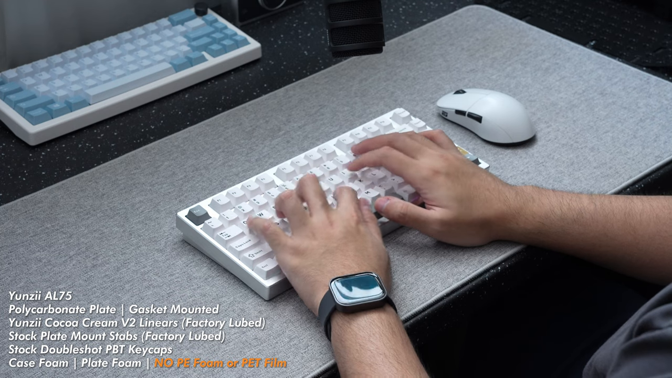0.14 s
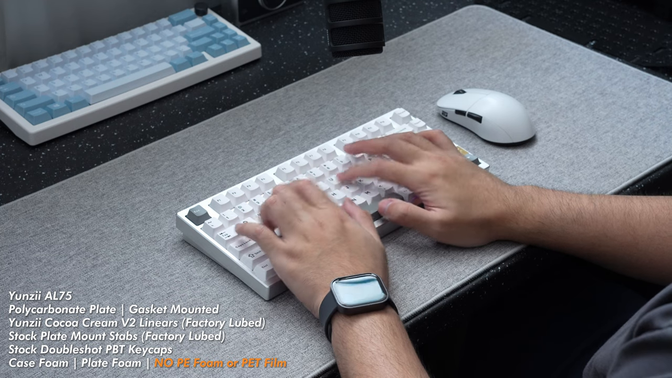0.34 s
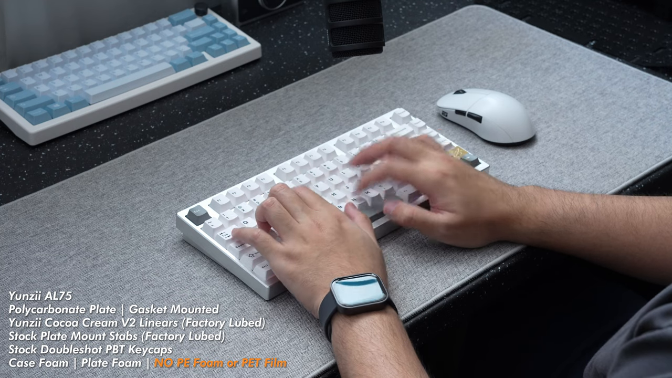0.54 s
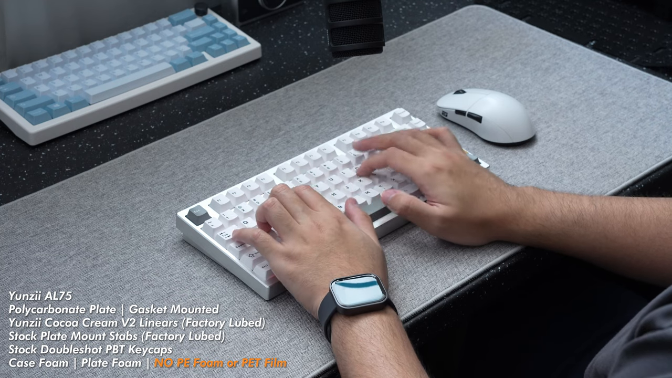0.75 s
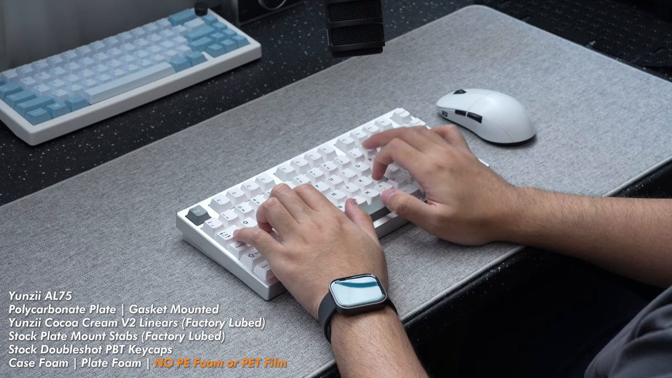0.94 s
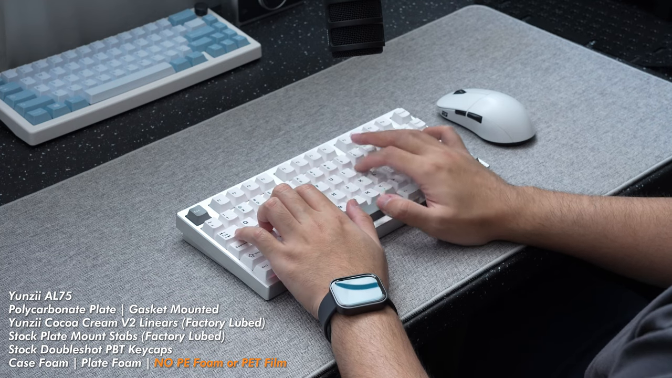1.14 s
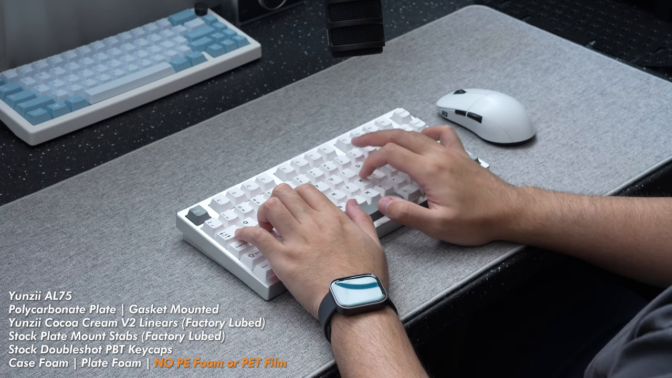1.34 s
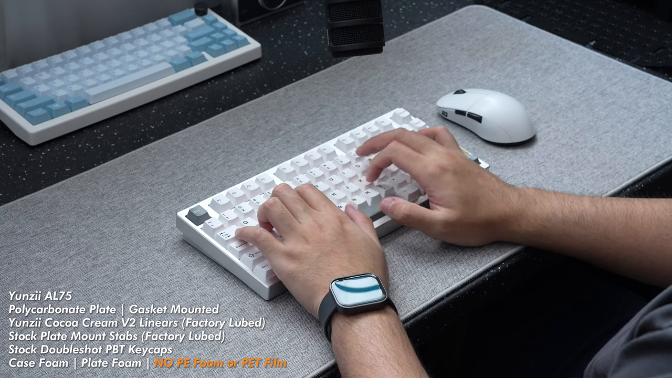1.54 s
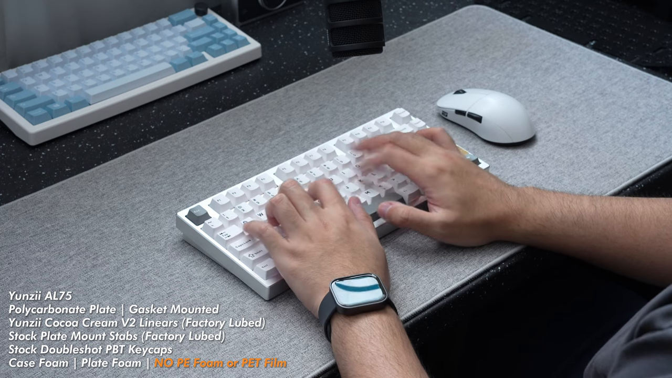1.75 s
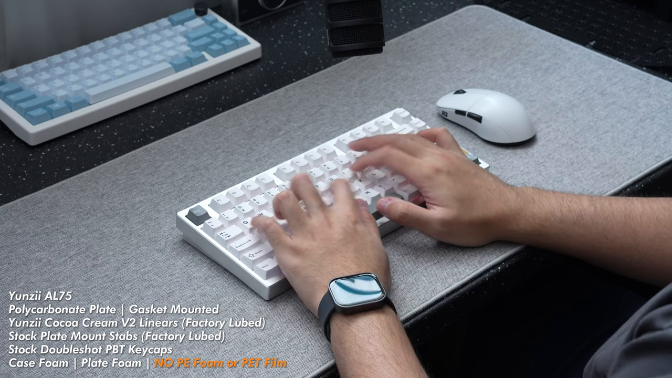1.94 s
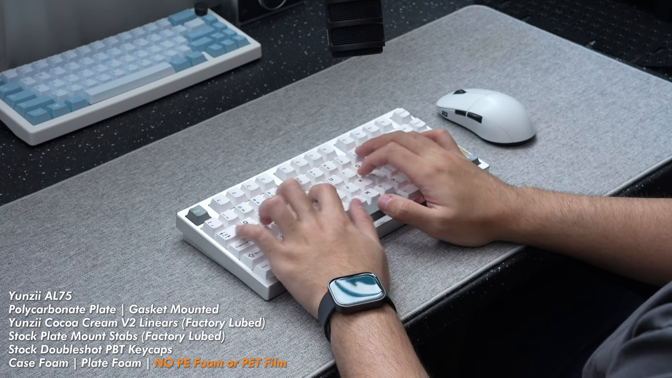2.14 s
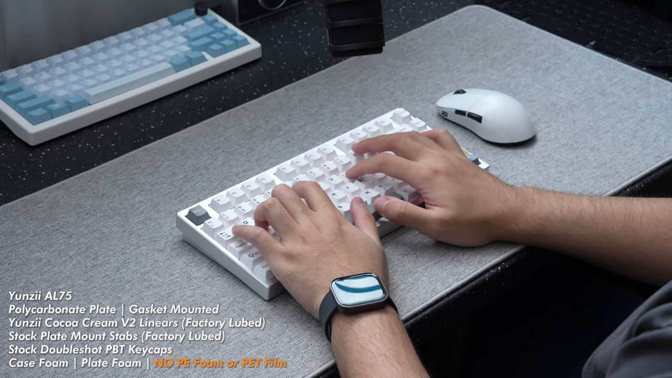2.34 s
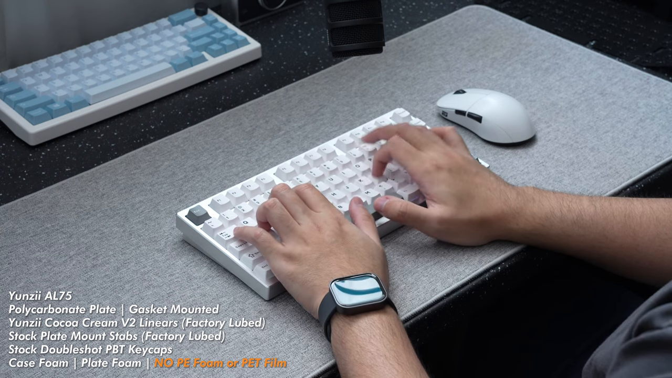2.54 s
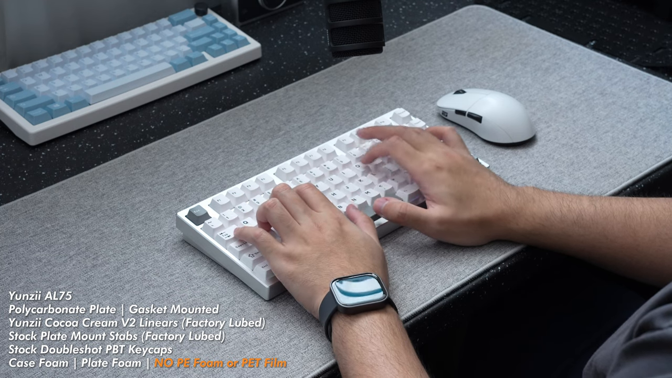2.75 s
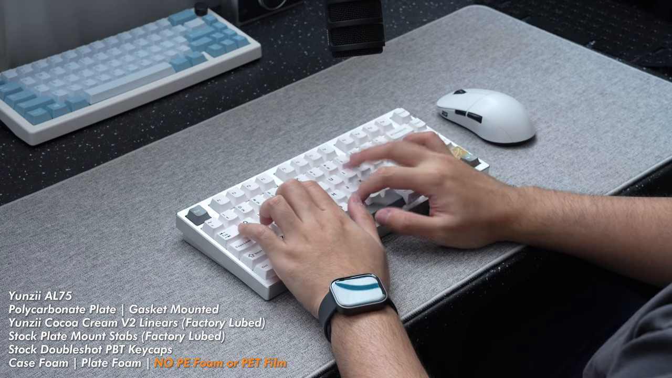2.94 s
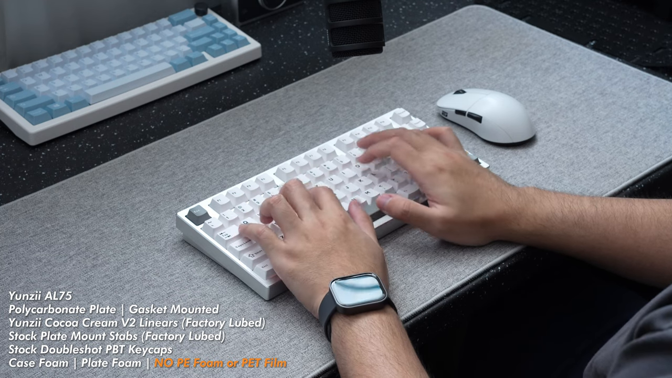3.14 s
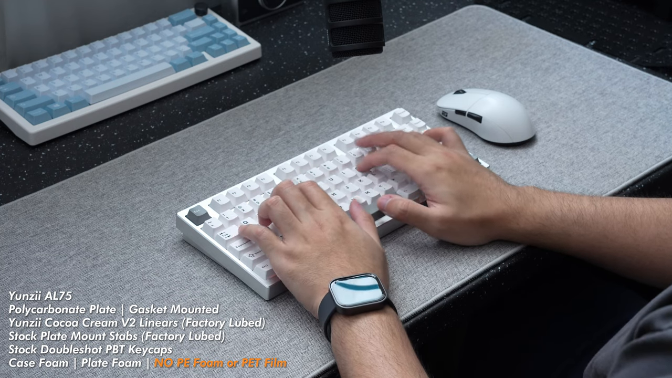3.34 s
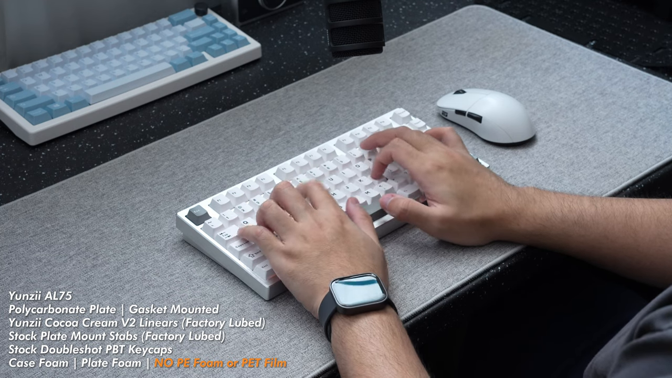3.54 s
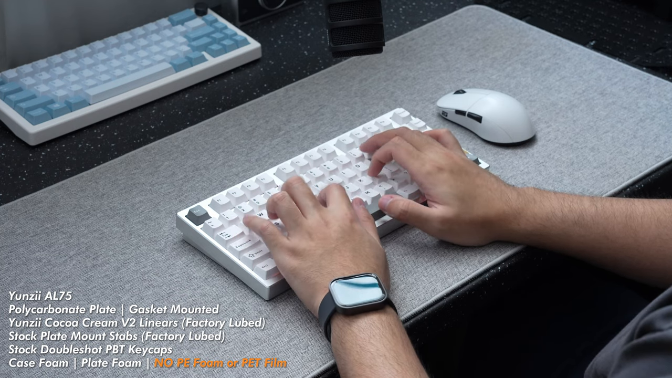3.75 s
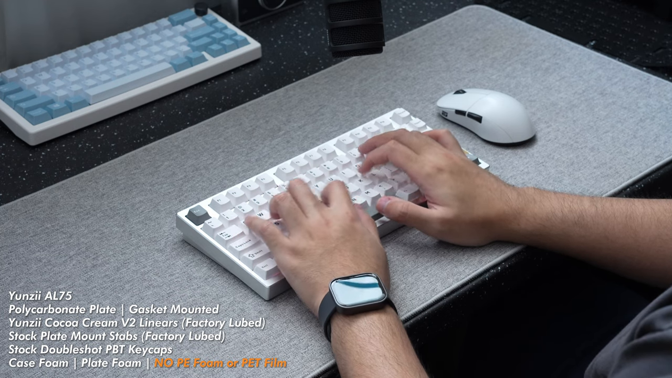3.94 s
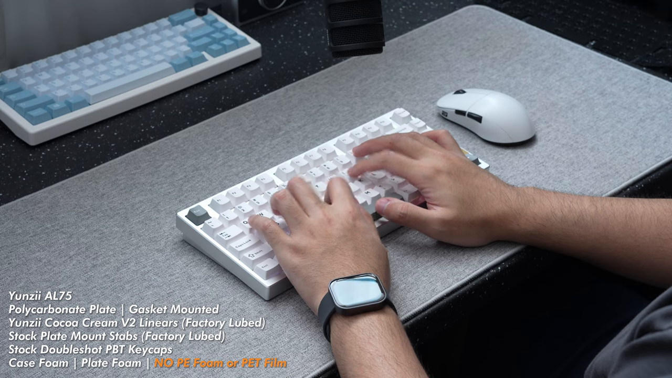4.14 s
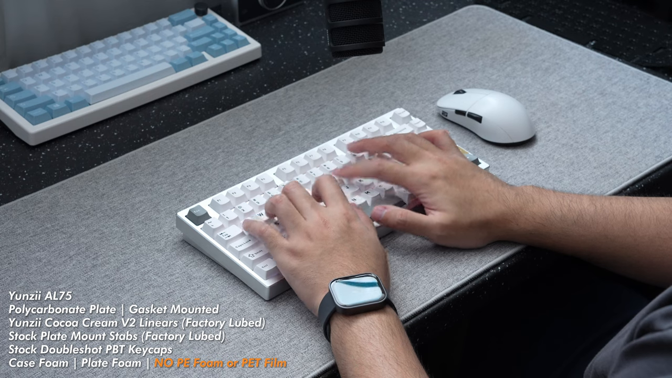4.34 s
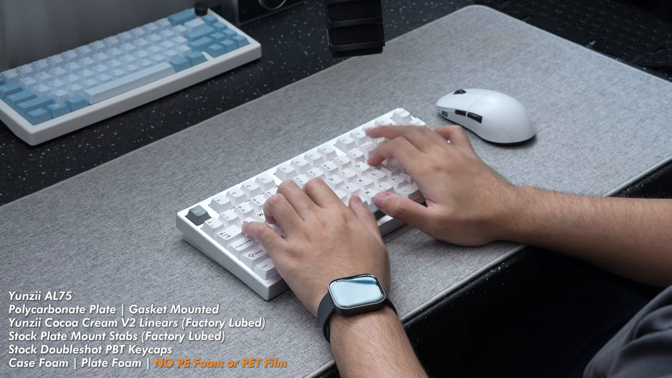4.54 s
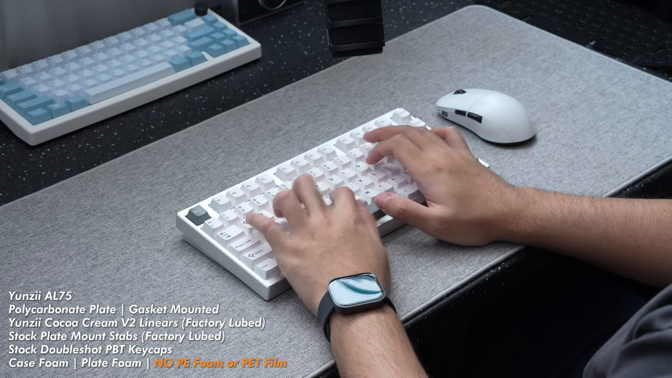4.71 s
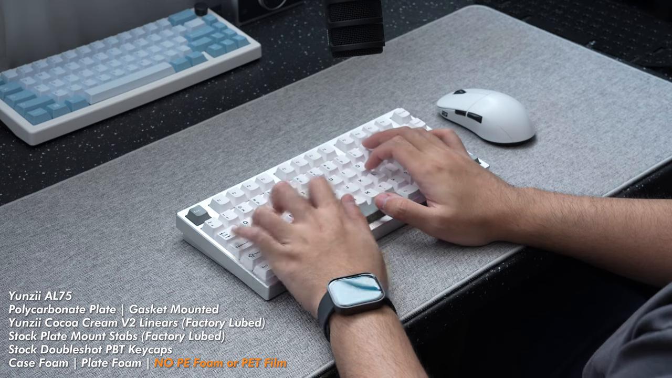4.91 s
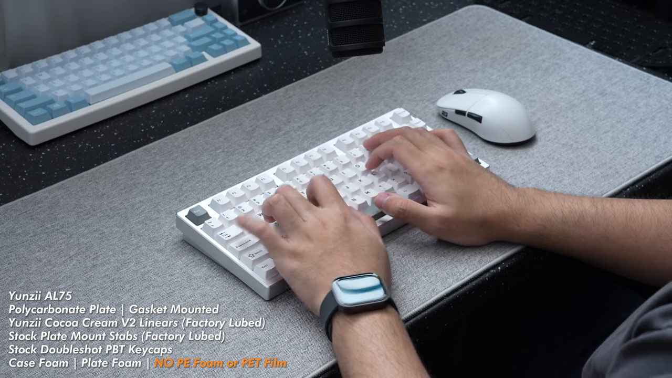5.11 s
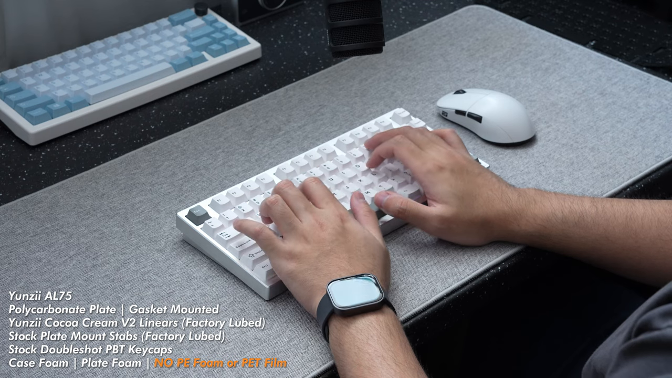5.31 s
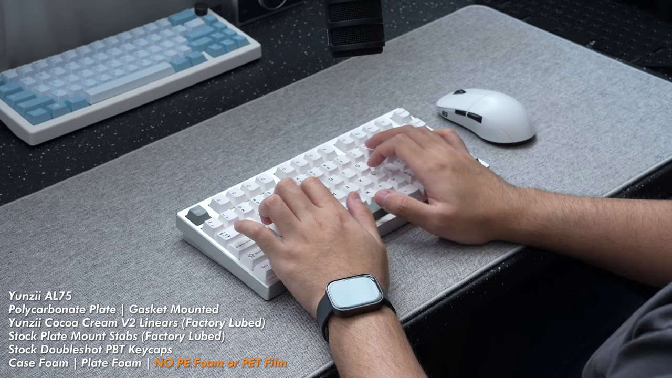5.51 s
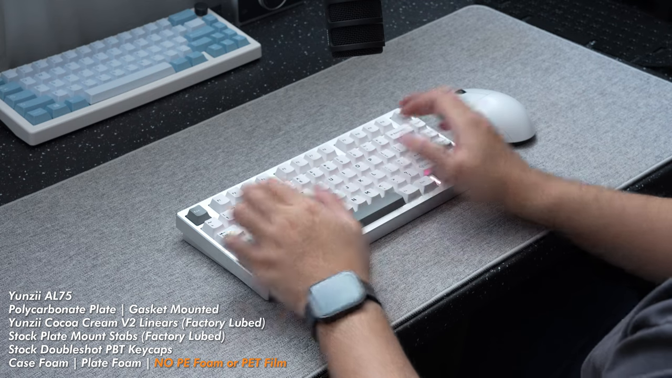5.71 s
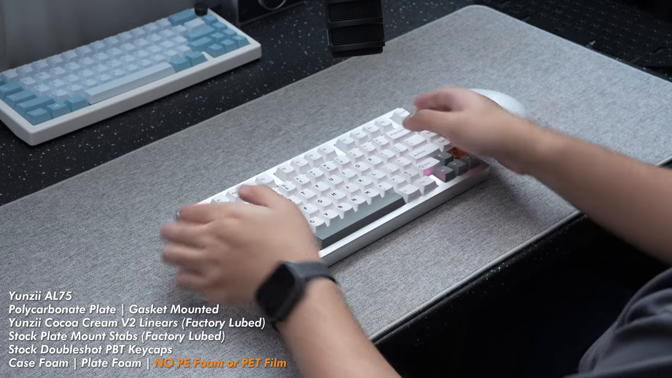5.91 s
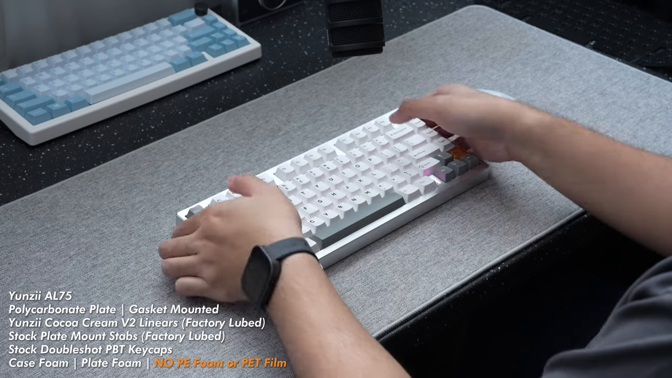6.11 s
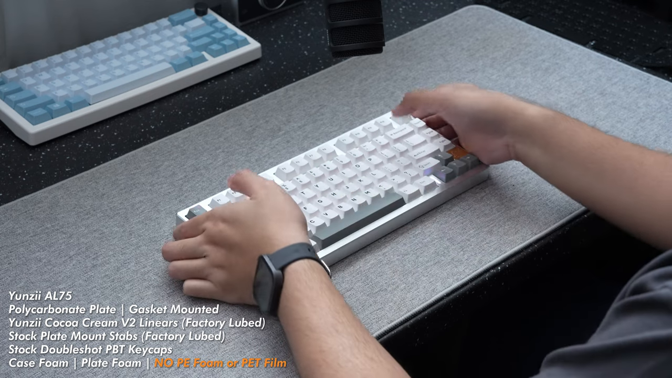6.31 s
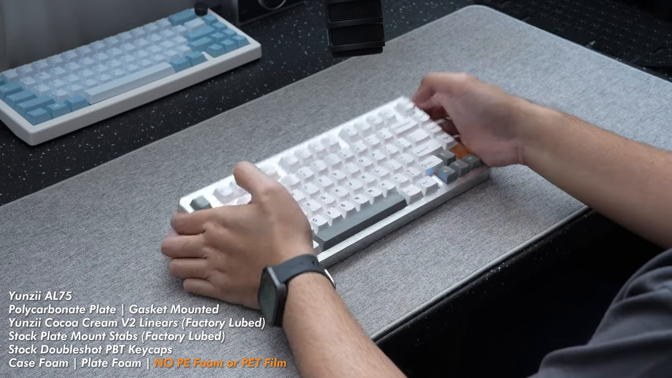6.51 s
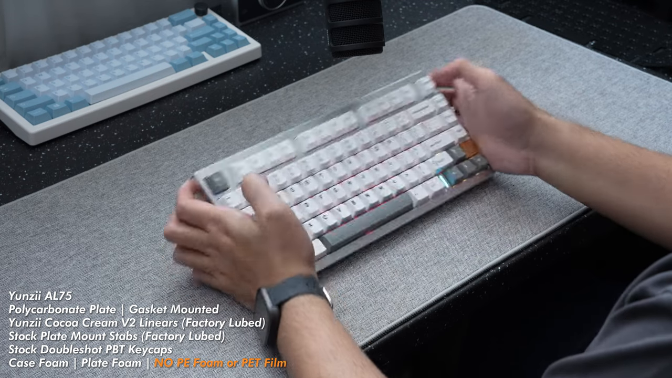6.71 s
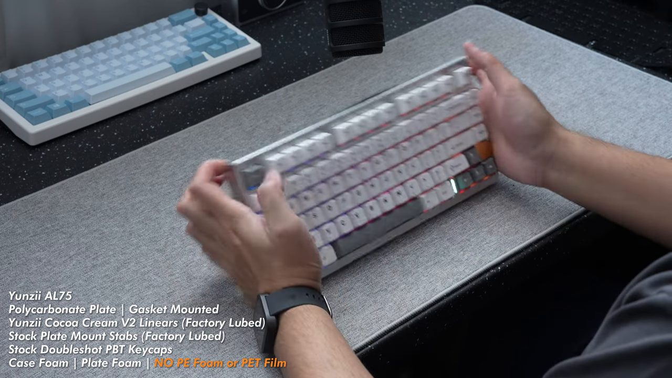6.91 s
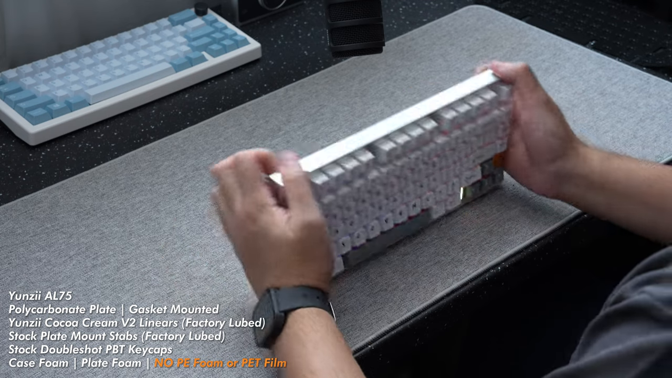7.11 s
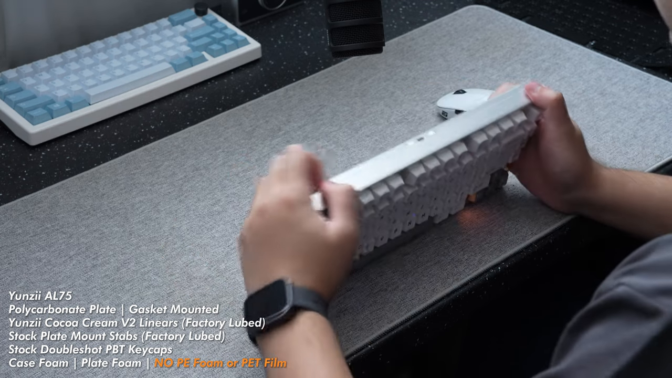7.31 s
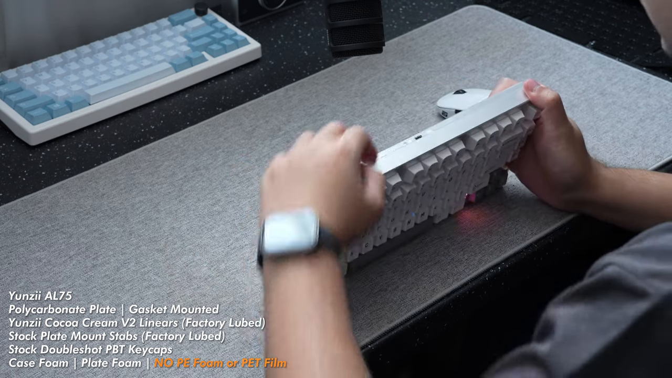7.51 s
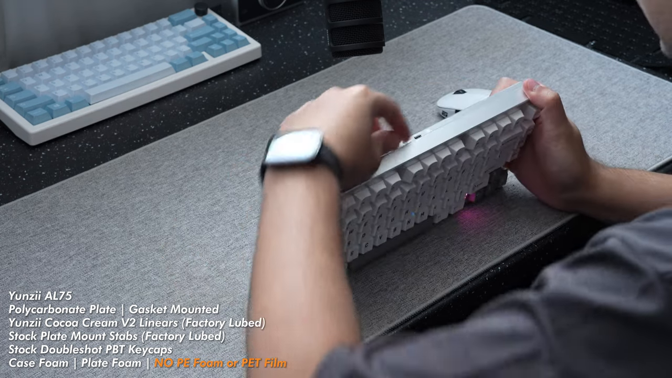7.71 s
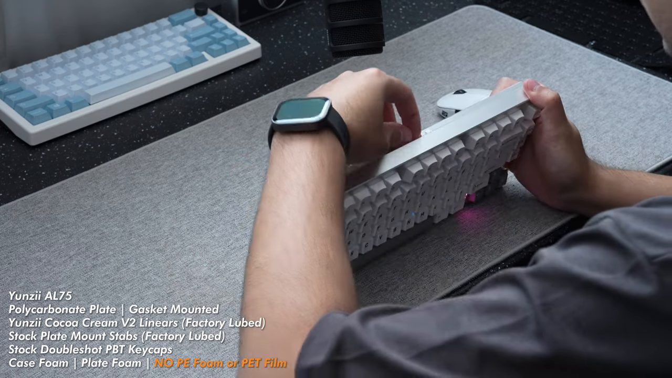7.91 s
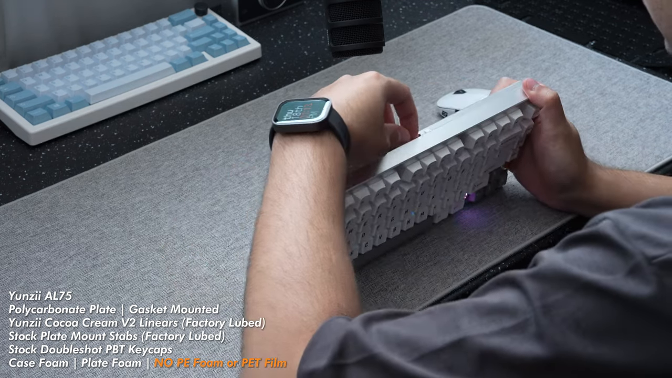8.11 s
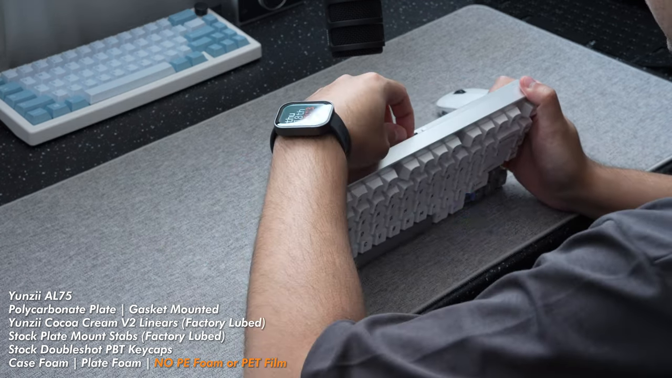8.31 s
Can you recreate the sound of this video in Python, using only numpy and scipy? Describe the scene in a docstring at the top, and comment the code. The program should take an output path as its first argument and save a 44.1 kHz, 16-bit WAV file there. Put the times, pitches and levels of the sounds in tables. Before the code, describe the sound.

Close to the microphone, fingers type quickly on a foam-damped mechanical keyboard: crisp clacks, lighter spring-back clicks and lower, hollow space bar thocks. After about five seconds typing stops. Much quieter handling follows, with palms rubbing the case, a soft bump on the desk mat, tiny squeaks, skin sliding and light taps. A faint low fan hum stays behind in a small, dry room.

```python
"""A quiet small room, one close microphone: fast typing on a foam-damped mechanical keyboard.
Keycaps clack down and spring back and the space bar thocks lower, each a minimum-phase ring of
damped modes blurred by noise bursts. Then the typing stops; two hands slide over the case and tip it
up on the desk mat, as swelling filtered noise with taps, a bump and squeaks.
A fan hums behind, as wandering sines over low air noise."""
import sys
import numpy as np
from scipy import signal
from scipy.fft import rfft, irfft, next_fast_len
from scipy.io import wavfile
from scipy.ndimage import uniform_filter1d

SR = 44100
rng = np.random.default_rng(int(sys.argv[2]) if len(sys.argv) > 2 else 0)


def wav_out(sig):
    """Save sig, one row per channel (or a flat mono array), as 16-bit PCM at SR to the path in sys.argv[1]."""
    wavfile.write(sys.argv[1], SR, np.round(np.clip(np.atleast_2d(sig).T, -1, 1) * 32767).astype(np.int16))


N = 373086
TIME = np.arange(N) / SR
CUTOFF_HZ = 16000
SIZE = 4096  # samples in one short sound
AGE = np.arange(SIZE) / SR
HZ = np.maximum(np.arange(SIZE // 2 + 1) * SR / SIZE, 1)

# Keys bottoming out. Each row: time in seconds, relative level in dB, cap pitch in Hz, plate in dB,
# brightness in dB.
PRESSES = [(0.0583, -1, 2280, 0, 8), (0.1797, 3.5, 2650, 1, 4), (0.3038, 7, 2330, 2.5, -1),
           (0.4006, 0.0, 2550, -5, 1), (0.4611, 10.5, 2440, -3, -0.5), (0.619, 8, 2680, -1, -1),
           (0.774, 1.5, 2570, -4.5, -5.5), (0.9784, 14, 2660, -6.5, 0), (1.122, 11.5, 2360, -2.5, -1),
           (1.2706, 8.5, 2450, -3.5, -4.5), (1.4466, 3, 2360, -5, 0.5), (1.7146, 1, 2420, 4, 7),
           (1.85, 14, 2720, 1, -2.5), (1.9015, 2.5, 2480, -1.5, 10), (2.0386, 2, 2410, 5, 6),
           (2.183, 4.0, 2380, -9, -9), (2.3202, 6.5, 2640, -2, 2.5), (2.3875, 7.5, 2570, 2.5, -4),
           (2.5288, 8.5, 2610, -4, 3), (2.6568, 7, 2500, -4, 4), (2.8217, 11.0, 2450, -3.5, 0),
           (2.983, 12, 2470, -2, -3.5), (3.0389, 5, 2300, -6, -0.5), (3.1603, 11.5, 2400, -11, -4.5),
           (3.2279, 15.5, 2620, 3, 1), (3.3457, 11.5, 2410, -1.5, 1.5), (3.5611, 4, 2000, -18, 1.5),
           (3.6231, 4, 2560, 0.5, 2), (3.801, 2.0, 2400, 3, 9), (3.881, 6.0, 2350, -6, -2),
           (4.0312, 1.5, 2180, -2, 8), (4.0914, 11.0, 2620, 2.5, -3.5), (4.2041, 2, 2250, 1.5, 5),
           (4.3235, -3, 2820, 1.5, -6), (4.4325, 11.0, 2500, 4.5, -4), (4.5872, 11.0, 2450, -2, 0.5),
           (4.7592, 1.5, 2530, -0.5, 1.5), (4.9052, 9, 1950, -6, 5), (5.0194, 1.5, 2290, 0.5, 6),
           (5.0648, 12.0, 2440, -5.5, -0.5)]
# Keys springing back to their top stop. Columns as in PRESSES.
RELEASES = [(0.0794, 5.5, 2390, 1, -4.5), (0.1184, 3.0, 1970, -1, 4), (0.2778, -2, 2590, 8, 7),
            (0.3928, 4, 2110, 8, 0), (0.5656, 1.5, 2060, -13, -1), (0.6865, 4.0, 2360, 5, -2.5),
            (0.8495, 7.5, 2400, -4.5, -6), (1.0527, 7, 2270, -0.5, -0.5), (1.3657, 8.5, 2270, -2, -3),
            (1.5362, 1.5, 2280, -2.5, 1), (1.7746, 1, 2310, 12.5, 6), (1.9543, 5, 2400, 3, -2),
            (1.9652, 1.5, 2200, -2, 7.5), (2.1109, 5, 2250, 0, 4.5), (2.285, 2, 2260, -5, -3.5),
            (2.4535, 9.0, 2320, 5, -0.5), (2.6046, 6.5, 2370, -6, -1.5), (2.7467, 5.5, 2300, -3, 0),
            (2.8995, 10.5, 2190, -4.5, 0.5), (3.0877, 2.5, 2260, 4, -1), (3.2679, 6.0, 2150, -8, -3),
            (3.2943, 12.5, 2340, -0.5, -1.5), (3.4452, 3.5, 2290, -1, -4), (3.6316, -0.5, 2370, 5, 3),
            (3.687, 1.5, 2080, -6, -4.5), (3.7284, 2.0, 2300, -2, 1), (3.9207, -3.5, 2110, 1, 5),
            (3.975, -1.5, 2170, -7, -0.5), (4.1928, 3.5, 2420, 5, -5), (4.3072, -1, 2420, -3, -16.5),
            (4.36, 0.5, 2340, -8, -3), (4.5009, 11, 1890, 2, -1.5), (4.701, 2, 2160, -4, 1),
            (4.8375, 8.5, 2580, 4, 7.5), (5.0085, 2.5, 1950, -2, -2), (5.1176, 5, 2260, -4, 0.5),
            (5.171, 2, 2110, -8, 2)]
# Space bar springing back. Each row: time in seconds, relative level in dB, clack in dB.
BAR_UP = [(.3496, 6.5, -3), (0.6535, 7.5, -6), (0.953, 6, -2.5), (1.6969, 2, -2), (2.3528, 6.5, -4),
          (2.8603, 4, -2), (3.1995, 8, -0.5), (3.5155, 7.5, 0.5), (4.0539, 4.5, -3), (4.4379, 7.5, 5),
          (4.7437, 5, 7), (5.2329, 9.5, 5.5)]


def from_db(db):
    """Decibels to gain."""
    return 10 ** (np.asarray(db) / 20)


def rms_one(x):
    """Scale to unit rms."""
    return x / np.sqrt(np.mean(x ** 2) + 1e-20)


def at_hz(points, hz):
    """Read (Hz, value) points on a log-frequency axis."""
    points = np.array(points)
    return np.interp(np.log(hz), np.log(points[:, 0]), points[:, 1])


def band(x, low_hz, high_hz):
    """Butterworth band-pass."""
    edges_hz = [low_hz, min(high_hz, SR / 2 - 1)]
    return signal.sosfilt(signal.butter(2, edges_hz, "band", fs=SR, output="sos"), x)


def add(track, s, sound):
    """Mix a sound into a track from time s on; a start before 0 moves to 0."""
    start = max(round(s * SR), 0)
    track[start:start + len(sound)] += sound[:len(track) - start]


def noise(spectrum):
    """Steady noise coloured by (Hz, relative dB) points, rms 1."""
    size = next_fast_len(N)
    hz = np.maximum(np.arange(size // 2 + 1) * SR / size, 1)
    white = rfft(rng.standard_normal(size))
    return rms_one(irfft(white * from_db(at_hz(spectrum, hz)), size)[:N])


def resonances(modes):
    """Magnitude response of damped (Hz, width Hz, dB) resonances."""
    hz, width_hz, db = np.transpose(modes)[:, :, None]
    detune = (HZ / hz - hz / HZ) * hz / width_hz
    return np.sqrt(np.sum((from_db(db) / (1 + detune ** 2)) ** 2, axis=0))


def struck(magnitude):
    """Causal, minimum-phase impulse response: all rings start at the moment of contact."""
    cepstrum = irfft(np.log(magnitude + 1e-7))
    cepstrum[1:SIZE // 2] *= 2
    cepstrum[SIZE // 2 + 1:] = 0
    return irfft(np.exp(rfft(cepstrum)))


def coloured(modes, thump_db, plate_db, clack_db, tick_db):
    """Where and how hard a finger lands decides how strongly each mode is driven."""
    # Centres of thump, plate, cap, clack and tick in Hz; the colour is relative to the cap.
    registers_hz = [600, 1300, 2400, 5000, 9000]
    colour = list(zip(registers_hz, [thump_db, plate_db, 0, clack_db, tick_db]))
    return [(hz, width_hz, db + at_hz(colour, hz)) for hz, width_hz, db in modes]


def stroke(modes, chatter_db, chatter_s, rattle_db, rattle_t60, low_t60, split_hz,
           notches=(), flex_hz=7000):
    """A hard contact, a dense settling chatter, then a rattle whose lows and highs have their own decays."""
    body = resonances(modes)
    for hz, width_hz, db in notches:
        body = body * from_db(db / (1 + (2 * (HZ - hz) / width_hz) ** 2))
    white = rng.standard_normal((2, SIZE))
    chatter = white[0] * AGE * np.exp(-AGE / chatter_s)
    chatter *= from_db(chatter_db) / np.linalg.norm(chatter)
    low = signal.sosfilt(signal.butter(4, split_hz, fs=SR, output="sos"), white[1])
    high = signal.sosfilt(signal.butter(2, split_hz, "high", fs=SR, output="sos"), white[1])
    rattle = high * from_db(-60 * AGE / rattle_t60) + low * from_db(-60 * AGE / low_t60)
    rattle *= from_db(rattle_db) / np.linalg.norm(rattle)
    contact = 1 + rfft(chatter + rattle)
    # chatter spreads the energy of the blow in time without adding to it
    spread = np.sqrt(uniform_filter1d(np.abs(contact) ** 2, size=110))
    # in a flexing plate the highs travel a little ahead of the lows
    flex = (flex_hz - 1j * HZ) / (flex_hz + 1j * HZ)
    fade = np.linspace(1, 0, SIZE) ** 2
    return irfft(rfft(struck(body / spread)) * contact * flex) * fade


def room(x, build_s=0.003):
    """Near surfaces reflect first, then a weak diffuse tail dies away, each band at its own rate."""
    # Diffuse tail. Each row: band centre in Hz, level in dB, t60 in seconds.
    tail_bands = [(250, -11.5, 0.18), (715, -15, 0.1), (1513, -22, 0.31), (3037, -24.5, 0.32),
                  (6000, -23.5, 0.23), (11915, -23.5, .15)]
    # Early reflections. Each row: delay in seconds, level in dB.
    reflections = [(.0024, -27.5), (.0096, -34), (0.0109, -31.5), (0.0124, -35)]
    age = TIME[:SR // 2]
    response = np.zeros(len(age))
    centres_hz = np.array(tail_bands)[:, 0]
    edges_hz = [120, *np.sqrt(centres_hz[1:] * centres_hz[:-1]), CUTOFF_HZ]
    for (_, db, t60), low_hz, high_hz in zip(tail_bands, edges_hz, edges_hz[1:]):
        decay = from_db(-60 * age / t60) * (1 - np.exp(-(age / build_s) ** 2))
        diffuse = band(rng.standard_normal(len(age)), low_hz, high_hz)
        response += from_db(db) * diffuse * decay / np.linalg.norm(decay)
    for delay_s, db in reflections:
        add(response, delay_s, from_db([db]))
    return signal.oaconvolve(x, response)[:N]


def background(air_db=-62):
    """Low air noise with the slowly wandering tones of a fan and the mains."""
    # Air noise. Each row: frequency in Hz, relative density in dB per Hz.
    air_spectrum = [(20, -6.5), (60, -10), (125, 1), (180, -5.5), (300, -11.5), (420, -18), (500, -17.5),
                    (700, -27), (1000, -29), (1200, -24.5), (1700, -33), (4000, -37.5), (15500, -42.5),
                    (16500, -63)]
    # Fan and mains hum. Each row: frequency in Hz, level in dB rms, line width in Hz.
    tones = [(67.4, -69, 5), (90.2, -67, 2.5), (122.1, -63.5, .5), (181.3, -72, 2), (236.5, -73, 1.5),
             (486, -78, 42)]
    out = from_db(air_db) * noise(air_spectrum)
    for hz, db, width_hz in tones:
        wander = np.cumsum(rng.standard_normal(N)) * np.sqrt(2 * np.pi * abs(width_hz) / SR)
        phase = 2 * np.pi * hz * TIME + uniform_filter1d(wander, size=800)
        out += from_db(db) * np.sqrt(2) * np.sin(phase)
    return out


def earlier_typing(level_db=-56, t60=0.22):
    """The typing is already under way, so the room still rings from the strokes before."""
    colour = [(200, -17), (900, -0.5), (2400, 1), (5000, -9), (7000, -18), (11000, -21), (16000, -32.5)]
    return from_db(level_db - 60 * TIME / t60) * noise(colour)


def desk():
    """The desk top sways under typing and shifting weight, as low noise around its lowest resonance."""
    # Sway under the typing, then the lift. Each row: time in seconds, level in dB rms.
    sway_level = [(0.0, -72), (0.35, -56), (1.3, -67), (3.6, -63), (4.6, -58.5), (5.1, -59), (5.55, -76.5),
                  (6.45, -69), (6.85, -55.5), (7.35, -64)]
    # Each row: frequency in Hz, relative density in dB per Hz.
    sway_spectrum = [(15, -23.5), (26, -12.5), (33, -1), (40, -9.5), (52, -12), (80, -33.5), (200, -90)]
    s, db = np.transpose(sway_level)
    return from_db(np.interp(TIME, s, db)) * noise(sway_spectrum)


def bar_contacts():
    """Each use of the bar is a landing, a return and a bounce: (s, level dB, clack dB, colour)."""
    # Landings between words. Each row: time in seconds, relative level in dB, clack in dB.
    bar_down = [(.2473, 11.5, -2), (0.5443, 10, -4), (0.8613, 8, -1), (1.6033, 10.5, 1.5),
                (2.2414, 11.5, -0.5), (2.7574, 10.5, 1), (3.0937, 9.5, -4), (3.4251, 8.5, 0),
                (3.9398, 10.5, -1), (4.3425, 10, -1), (4.6554, 9, 2.5), (5.134, 15, 1.5)]
    # Colours: thump, plate, clack, tick, all in dB.
    down_colour_db = (-0.5, -0.5, -2, -4.5)
    up_colour_db = (0, 0, -4.5, 3.5)
    # on its way up the bar bounces once on its stabiliser
    bounce_s, bounce_db = 0.0063, -8
    landings = [(s, db, clack_db, down_colour_db) for s, db, clack_db in bar_down]
    returns = [(s, db, clack_db, up_colour_db) for s, db, clack_db in BAR_UP]
    bounces = [(s + bounce_s, db + bounce_db, clack_db, colour) for s, db, clack_db, colour in returns]
    return landings + returns + bounces


def swelling_grain(level_db=-66, swell_s=0.012, grain_db=-0.5):
    """A faint grainy noise swells up to each contact."""
    swells = np.zeros(N)
    for s, db, *_ in [*PRESSES, *RELEASES, *bar_contacts()]:
        add(swells, s - SIZE / SR, from_db(0.5 * db) * np.exp(-AGE[::-1] / swell_s))
    grain = from_db(grain_db * rms_one(band(rng.standard_normal(N), 20, 400)))
    colour = [(200, -34.5), (700, -2.5), (2400, 0.5), (4500, -3.0), (7000, -9.5), (10000, -7), (16000, -22.0)]
    return from_db(level_db) * swells * rms_one(grain * noise(colour))


def fingertips(brush_db=-24, lead_s=0.009, graze_db=-27, grazes_per_s=5):
    """Skin and nail tick softly on a cap; fainter ones lead about half the presses or fall at random."""
    # Soft fingertip ticks on the caps, many just before a press. Each row: time in seconds,
    # level in dB, tick in dB.
    touches = [(.042, -17, -6), (.152, -18, -2), (.454, -22, 2), (.6085, -10.5, 0), (.7558, -11.5, 2.5),
               (1.1115, -9.5, -1), (1.4205, -12, -8), (1.769, -7.5, -13.5), (1.8423, -9, -4),
               (2.1653, -16, -11), (2.8091, -6.5, 6), (2.8853, -15, -10), (2.9744, -16, 7),
               (3.0717, -11, -11), (3.1403, -12, -6), (3.2213, -13, 2), (3.3342, -14, 8), (3.789, -15, -9),
               (4.1255, -15, -4), (4.1313, -8, -1), (4.42, -16, -15), (4.429, -26, 14), (4.577, -16.5, 2),
               (4.897, -29, -4), (5.002, -18, 1), (5.058, -16.5, -2)]
    out = np.zeros(N)
    brushes = []
    for (s, *_), (chance, early) in zip(PRESSES, rng.random((len(PRESSES), 2))):
        if chance < 0.5:
            brushes.append((s - lead_s * (0.5 + early), brush_db, 0))
    typing_s = BAR_UP[-1][0]
    # resting fingers graze the caps while typing goes on
    grazes = [(when * typing_s, graze_db, 0) for when in rng.random(round(grazes_per_s * typing_s))]
    for s, db, tick_db in list(touches) + brushes + grazes:
        modes = [(1303, 1200, -3.5), (3030, 2500, 0), (9510, 4000, tick_db - 9.5)]
        touch = stroke(modes, chatter_db=2.5, chatter_s=0.00042, rattle_db=1, rattle_t60=0.02,
                       low_t60=0.02, split_hz=2000)
        add(out, s, from_db(db) * touch)
    return out


def keys(strokes, colour_db, hardening, cap_width_hz, level_db, chatter_db, rattle_db,
         case_db=-24, loose_db=1.0, scatter_db=1.0, usual_db=7.5):
    """Each cap adds its own broad pitch to the shared case and switch modes; some sit looser."""
    # Case, plate and switch under any key. Each row: frequency in Hz, width in Hz, level in dB.
    key_modes = [(635.6, 420, -12), (1480, 1000, -11.5), (3293, 1400, -6.5), (4929.0, 1600, -13),
                 (8670, 3000, -20.5), (11270, 1200, -22.5)]
    out = np.zeros(N)
    shared = key_modes + [(330, 180, case_db)]
    for s, db, cap_hz, plate_db, bright_db in strokes:
        # harder than usual contacts are shorter: thump and tick shift in dB per dB
        thump_db, tick_db = np.array(hardening) * (db - usual_db)
        own_db = [thump_db + plate_db / 2, plate_db, bright_db, bright_db + tick_db]
        colour = np.add(colour_db, own_db)
        modes = [(hz, width_hz, mode_db + scatter_db * rng.standard_normal())
                 for hz, width_hz, mode_db in coloured(shared, *colour)]
        modes.append((cap_hz, cap_width_hz, 0))
        loose = loose_db * rng.standard_normal()
        clack = stroke(modes, chatter_db=chatter_db + loose, chatter_s=0.00028,
                       rattle_db=rattle_db + loose, rattle_t60=0.0115, low_t60=0.032, split_hz=1545)
        add(out, s, from_db(db + level_db) * clack)
    return out


def letter_keys(release_room_db=-1.0, count=3):
    """Strokes are dealt to a few places on the board, each reaching the room by its own paths."""
    # Colours: thump, plate, clack, tick, all in dB.
    press_colour_db = (-3, 3.4, 2.5, -1.5)
    release_colour_db = (-1.16, 2, -4.5, 5)
    # under the finger a cap is damped and clacks; set free it rings narrower, with a fine tick
    press_width_hz, release_width_hz = 1144, 860
    press_hardening, release_hardening = (-0.19, 0.54), (-0.45, 0.18)  # thump, tick (dB per dB)
    out = np.zeros(N)
    for place in range(count):
        down = keys(PRESSES[place::count], press_colour_db, press_hardening, press_width_hz,
                    level_db=0.4, chatter_db=-3.5, rattle_db=-5.5)
        up = keys(RELEASES[place::count], release_colour_db, release_hardening, release_width_hz,
                  level_db=1.03, chatter_db=-2, rattle_db=-2)
        out += down + up + room(down + from_db(release_room_db) * up)
    return out


def space_bar(level_db=0.5, wire_hz=5325, wire_db=-54, wire_t60=0.043):
    """The long hollow bar thocks, and its stabiliser wire rings on faintly."""
    # Resonances of the bar. Each row: frequency in Hz, width in Hz, level in dB.
    bar_modes = [(353.0, 284.0, -13), (545, 300, -12), (1150, 570, -1), (1445, 390, -0.5),
                 (1754.0, 202.0, -4), (2351.0, 1000, -0.5), (3119.0, 320, -10.0), (3852.0, 1100, -14),
                 (4763, 570, -5), (5316, 220, -1.5), (5940, 660, -11.5), (8113.0, 3200, -23),
                 (11826.0, 1547.0, -34)]
    # Nodes between them. Each row: frequency in Hz, width in Hz, depth in dB.
    bar_notches = [(860, 140, -10.5), (1576, 130, -9.5), (1900, 170, -1), (4370, 300, -3.5),
                   (7300, 700, -5)]
    out = np.zeros(N)
    wire = from_db(wire_db - 60 * AGE / wire_t60) * np.sin(2 * np.pi * wire_hz * AGE)
    for s, db, own_clack_db, (thump_db, plate_db, clack_db, tick_db) in bar_contacts():
        clack_sum_db = clack_db + own_clack_db
        modes = coloured(bar_modes, thump_db, plate_db, clack_sum_db, tick_db)
        thock = stroke(modes, chatter_db=-6.0, chatter_s=0.00055, rattle_db=-12.0, rattle_t60=0.021,
                       low_t60=0.033, split_hz=1600, notches=bar_notches)
        add(out, s, from_db(db + level_db) * (thock + from_db(clack_sum_db) * wire))
    return out


def hands(grain_db=2.0, waver_db=1.5, skin_grain_db=1.0, roundness=1.1, slips_per_s=4000):
    """Moves swell and fade: palms stick and slip, ringing the case; dry skin hisses on the metal edge."""
    # Hands leave the keys, take hold of the case, tip it up and change grip. Each row: fastest moment
    # in seconds, rise in seconds, fall in seconds, palm rubbing in dB, skin sliding in dB.
    moves = [(5.7, .11, .08, -84, -81.5), (6.06, 0.12, 0.13, -72.5, -75), (6.38, .05, 0.087, -76, -78),
             (6.56, 0.045, 0.18, -65.5, -72), (6.78, 0.059, 0.11, -69, -80),
             (7.03, 0.12, 0.094, -66.5, -58.5), (7.31, 0.23, 0.12, -72.5, -71.5),
             (7.51, 0.15, 0.058, -77, -65), (7.78, .025, 0.11, -81.5, -71)]
    # Case under a rubbing palm. Each row: frequency in Hz, width in Hz, level in dB.
    rub_modes = [(684, 180, -1), (1453, 1700, 1), (2180, 2600, -3.5), (2820, 1900, 0), (3600, 520, -0.5),
                 (5460, 2700, -22)]
    # Sliding skin. Each row: frequency in Hz, relative density in dB per Hz.
    slide_spectrum = [(1760, -49), (3000, -8.5), (3260, -12), (4080, -9), (4570, 2), (5180, -7.5),
                      (5800, -1.5), (6390, -13), (7940, -4.5), (14000, -22), (16000, -34)]
    rub, slide = np.zeros((2, N))
    for s, rise_s, fall_s, palm_db, skin_db in moves:
        speed = np.exp(-np.abs((TIME - s) / np.where(TIME < s, rise_s, fall_s)) ** roundness)
        rub = np.hypot(rub, from_db(palm_db) * speed)
        slide = np.hypot(slide, from_db(skin_db) * speed)
    grip = rms_one(band(rng.standard_normal(N), 8.2, 34))
    slips = (rng.random(N) < slips_per_s / SR) * rng.standard_normal(N) * from_db(grain_db * grip)
    ringing = rms_one(signal.fftconvolve(slips, struck(resonances(rub_modes)))[:N])
    ridges = rms_one(from_db(skin_grain_db * rms_one(band(rng.standard_normal(N), 60, 700))))
    hiss = from_db(waver_db * grip) * ridges * noise(slide_spectrum)
    return rub * ringing + slide * hiss


def taps(level_db=14):
    """Fingers touch the case lightly as they change grip."""
    # Each row: time in seconds, relative level in dB, treble in dB.
    case_taps = [(5.67, -53.5, -17), (5.989, -44, -17.5), (6.202, -43, -9.5), (6.526, -42, -26),
                 (6.695, -41.5, -16), (6.71, -43, -19), (6.812, -44, -22), (7.334, -45, -16),
                 (7.757, -48.5, -2.5), (7.792, -55, 3), (8.337, -49.5, -2), (8.35, -37.5, -7.5)]
    out = np.zeros(N)
    for s, db, treble_db in case_taps:
        modes = [(680, 300, 3), (1290, 1500, -4.5), (3020, 7100, -6), (8100, 6700, treble_db)]
        touch = stroke(modes, chatter_db=0, chatter_s=0.0005, rattle_db=-2, rattle_t60=0.02,
                       low_t60=0.04, split_hz=2000)
        add(out, s, from_db(db + level_db) * touch)
    return out


def bumps(scuff_db=-6, scuff_t60=0.074):
    """The heavy case rocks onto the soft mat: decaying sines thud, feet scuff as it settles."""
    # Each row: time in seconds, level in dB.
    case_bumps = [(6.0636, -48)]
    # What rings. Each row: frequency in Hz, relative level in dB, t60 in seconds.
    desk_modes = [(212, 2, 0.064), (290, -1.5, 0.052), (427, -4.5, 0.023), (494, -7, 0.035),
                  (743, -9, 0.042), (945, -9.5, 0.035), (1130, -17, .035), (1770, -22, 0.045)]
    out = np.zeros(N)
    thud = sum(from_db(db - 60 * AGE / t60) * np.sin(2 * np.pi * hz * AGE) for hz, db, t60 in desk_modes)
    scuff_noise = rms_one(band(rng.standard_normal(SIZE), 170, 970))
    scuff = from_db(scuff_db - 60 * AGE / scuff_t60) * scuff_noise
    for s, db in case_bumps:
        add(out, s, from_db(db) * (thud + scuff))
    return out


def squeaks(width_hz=220):
    """Quick slips of a fingertip drive one narrow ring of the case as the grip tightens."""
    # Each row: centre time in seconds, length in seconds, pitch in Hz, level in dB.
    skin_squeaks = [(6.57, 0.045, 1500, -64.5), (6.57, .04, 2950, -69), (6.7, 0.017, 3120, -69),
                    (6.79, .04, 2850, -71), (7.31, .1, 3000, -74)]
    out = np.zeros(N)
    for s, length_s, hz, db in skin_squeaks:
        white = rfft(rng.standard_normal(SIZE))
        ring = rms_one(irfft(white * resonances([(hz, width_hz, 0)])))
        swell = np.exp(-(2 * (AGE - AGE.mean()) / length_s) ** 2)
        add(out, s - AGE.mean(), from_db(db) * swell * ring)
    return out


def scene(thud_room_db=15, bar_room_db=1.0):
    """One microphone feeds both channels; the wide desk top fills the room more than the keys."""
    bar, thud = space_bar(), bumps()
    handling = fingertips() + swelling_grain() + taps() + hands() + squeaks()
    to_room = handling + from_db(bar_room_db) * bar + from_db(thud_room_db) * thud
    tails = room(to_room) + earlier_typing()
    mono = letter_keys() + bar + handling + thud + tails + desk() + background()
    return np.array([mono, mono])


def record(dry):
    """A steep elliptic low-pass cuts the top."""
    return signal.sosfilt(signal.ellip(10, 0.1, 80, CUTOFF_HZ, fs=SR, output="sos"), dry)


dry = scene()
out = record(dry)
wav_out(out)
```